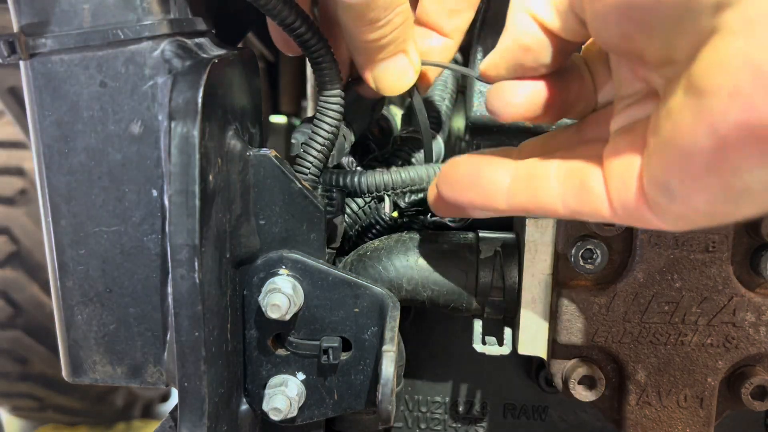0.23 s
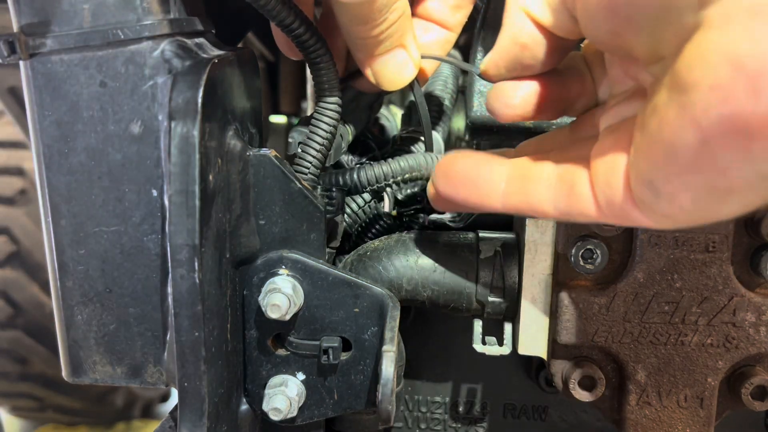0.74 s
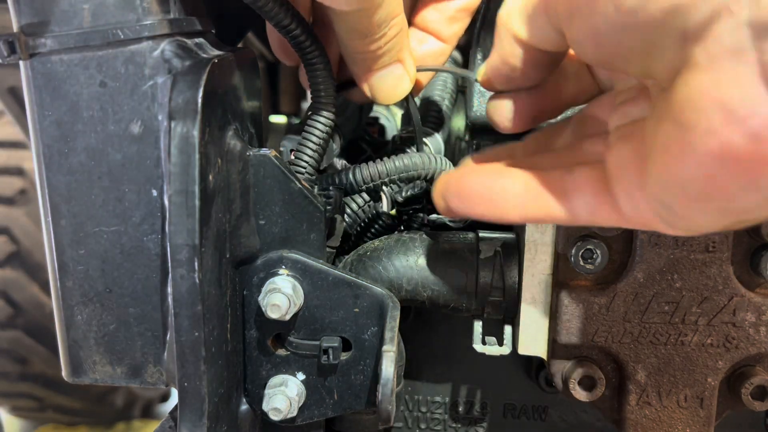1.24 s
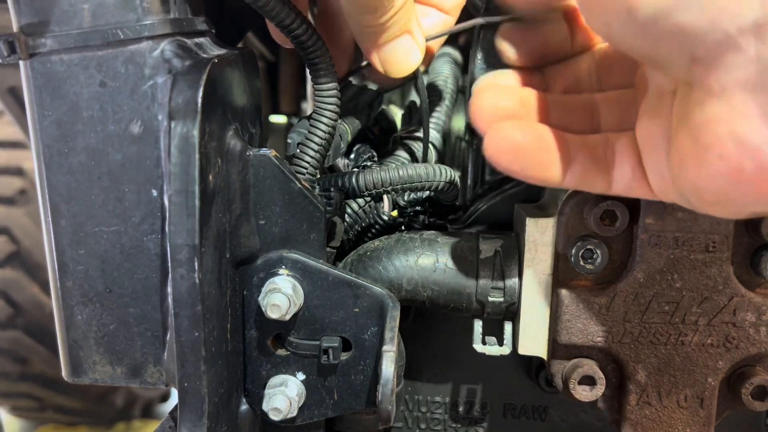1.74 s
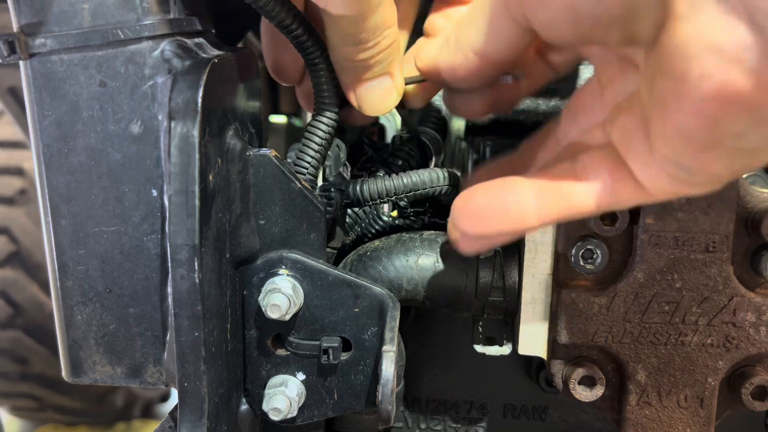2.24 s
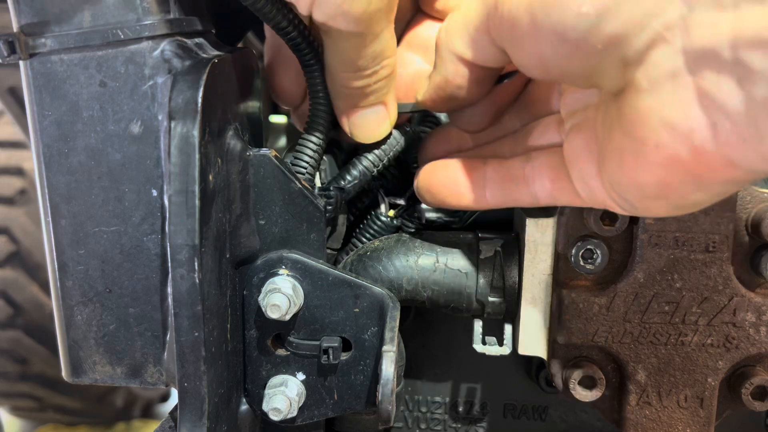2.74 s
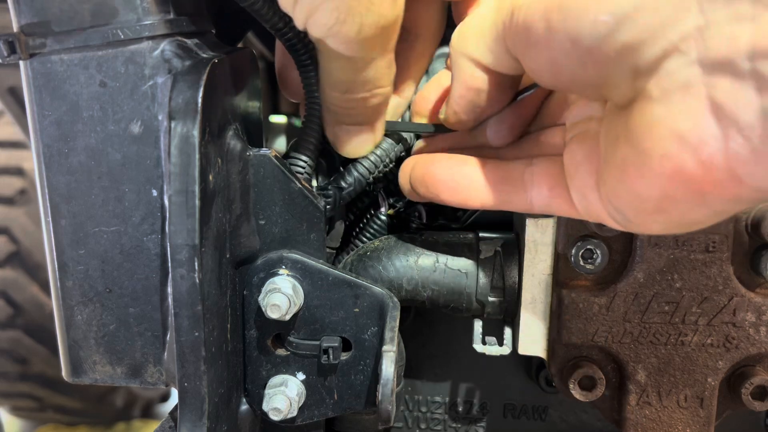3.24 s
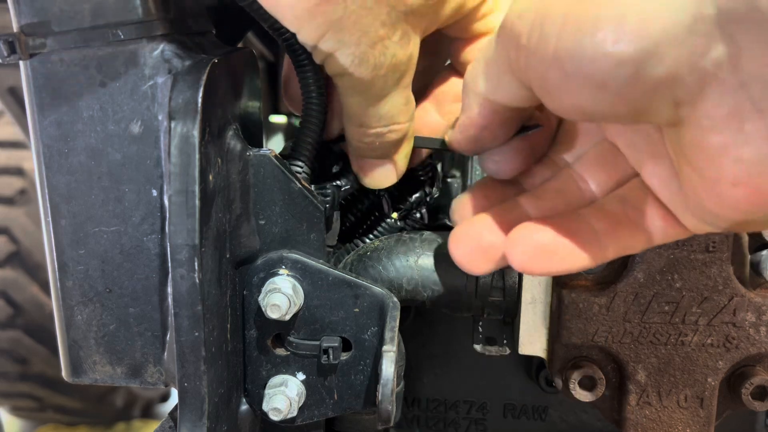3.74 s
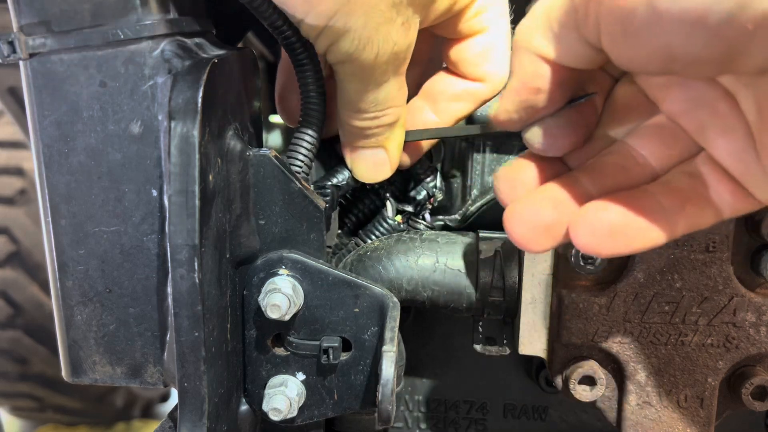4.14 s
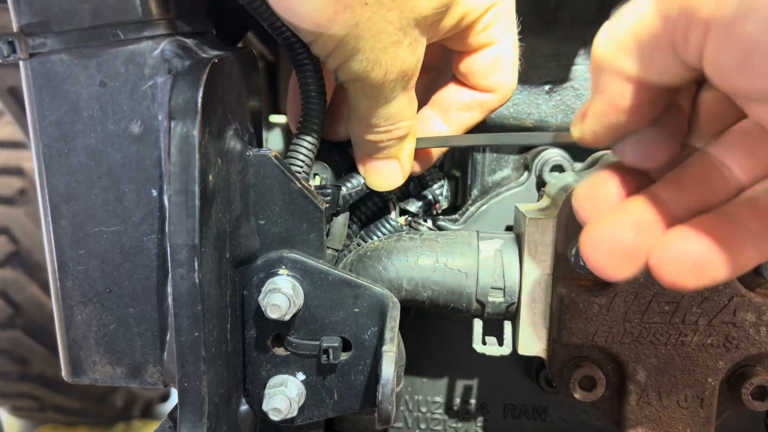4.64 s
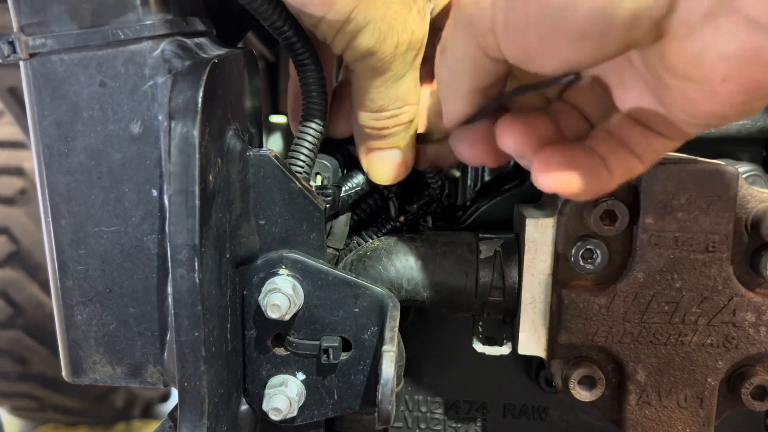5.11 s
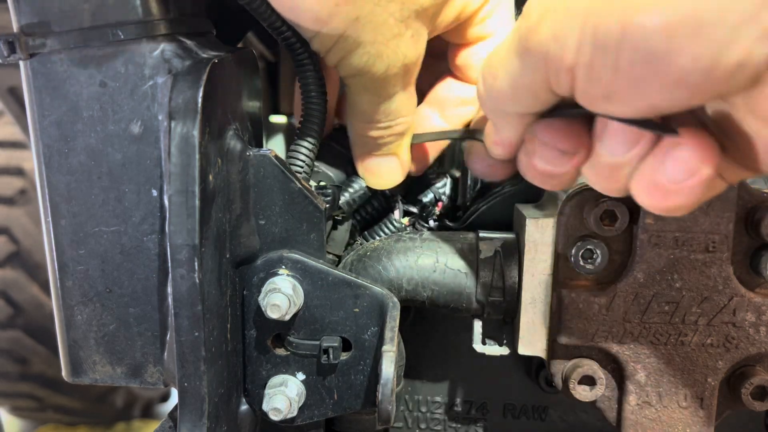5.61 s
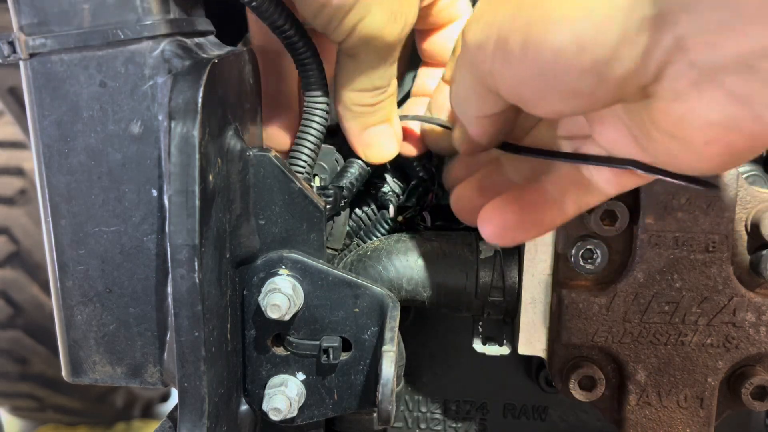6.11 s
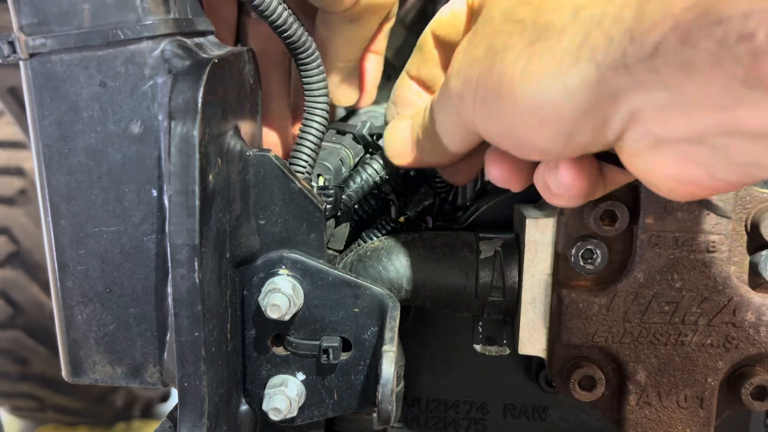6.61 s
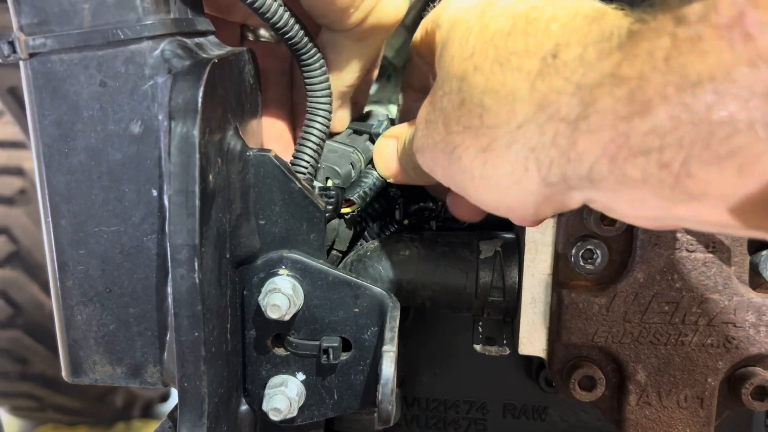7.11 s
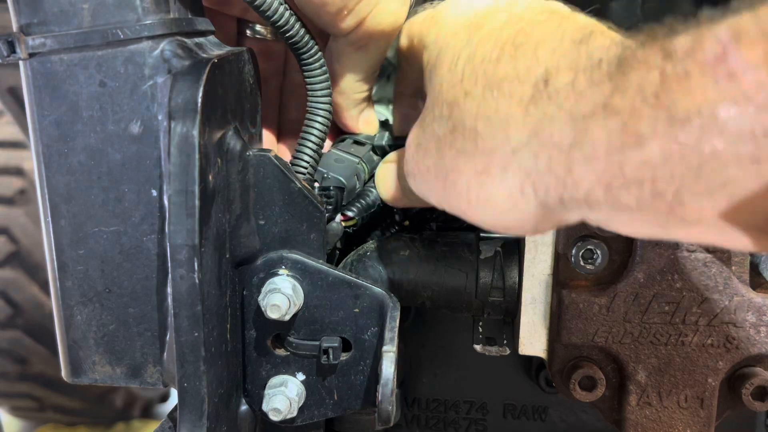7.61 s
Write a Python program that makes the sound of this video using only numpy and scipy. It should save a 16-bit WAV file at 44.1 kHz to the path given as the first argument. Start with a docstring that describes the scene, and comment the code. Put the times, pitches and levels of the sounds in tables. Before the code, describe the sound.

Close stereo sound of hands fitting a nylon zip tie round a wire harness in an engine bay. From 0 to 2.5 seconds there are small plastic taps and faint rustling on ribbed tubing, sparser after 1.5, with a firmer tap near 2.5. At about 2.7 the tie ratchets for a quarter second, sharp high clicks quickening. Scuffs and a soft rumble follow around 3. A longer, denser zip runs from 3.7 to 4.0, another from 4.15 to 4.45, both over low handling rumble. A clear knock comes near 4.9, then the last short zip from 5.25 to 5.5, ending with a hollow knock. A bright tap at 5.7, rubbing around 6.2 and a busy cluster of clicks and scrapes from 6.8 to 7.5 thin out by the end. Quiet air noise, low wavering machine hum and faint echo remain throughout.

```python
"""Engine bay in a workshop, close stereo microphone: a nylon zip tie is pulled tight round a harness.
In four pulls each tooth snaps the pawl, which rings very high, and flicks the strap into a falling chirp.
Between the pulls fingers tap and rub the plastic loom: dying modes, and runs of tiny noisy catches.
Behind lie steady air noise, wavering machine hum, low rumbles as the hand drags the harness, faint echo."""
import sys
import numpy as np
from scipy import signal
from scipy.fft import rfft, irfft
from scipy.io import wavfile

SR = 44100
rng = np.random.default_rng(int(sys.argv[2]) if len(sys.argv) > 2 else 0)


def store_pcm(level_fs):
    """Save levels as 16-bit WAV."""
    pcm = np.round(np.clip(level_fs, -1, 1) * 32767).astype(np.int16)
    wavfile.write(sys.argv[1], SR, np.atleast_2d(pcm).T)


N = 346626


def gain_of(db):
    """Decibels to amplitude."""
    return 10 ** (np.asarray(db) / 20)


def unit(x):
    """Scales a sound to energy 1."""
    return x / np.sqrt(np.sum(x ** 2) + 1e-20)


def read(points, hz):
    """Reads a table on a log-frequency axis."""
    f, value = np.transpose(points)
    return np.interp(np.log(hz + 1), np.log(f + 1), value)


def add(mix, s, sound):
    """Mixes a sound in at time s."""
    part = mix[max(round(s * SR), 0):][:len(sound)]
    part += sound[:len(part)]


def colour(x, points):
    """Filters by a spectrum in dB."""
    size = x.shape[-1]
    return irfft(rfft(x) * gain_of(read(points, np.fft.rfftfreq(size, 1 / SR))), size)


def click(points, size=1024):
    """A causal (minimum-phase) click of energy 1 with the given spectrum."""
    hz = abs(np.fft.fftfreq(size, 1 / SR))
    log_gain = np.log(gain_of(read(points, hz)))
    spectrum = np.exp(np.conj(signal.hilbert(log_gain)))
    return unit(np.fft.ifft(spectrum).real[:size // 2])


def ring(hz, t60, db, rise, scatter=1, size=2048):
    """Dying modes, energy 1, that build up over the rise time; with little scatter they start in step."""
    t = np.arange(size) / SR
    hz, t60, db = (np.reshape(c, (-1, 1)) for c in (hz, t60, db))
    decay = np.exp(-np.log(1000) * t / t60)
    cycles = hz * t + scatter * rng.random(hz.shape)
    modes = gain_of(db) * decay * np.sin(2 * np.pi * cycles)
    return unit(modes.sum(0) * (1 - np.exp(-t / rise)))


def scuffed(tick, decay, rough, rise):
    """A contact is never clean: a short burst of chatter swells and dies after the first touch."""
    t = np.arange(len(tick)) / SR
    envelope = np.exp(-t / decay) * (1 - np.exp(-t / rise))
    drive = rough * unit(rng.standard_normal(len(t)) * envelope)
    drive[0] += 1
    return unit(np.convolve(tick, drive))


def ramp(tick, swell, size=400):
    """Just before a slip the surfaces scrape, louder and louder."""
    t = np.arange(size) / SR
    scrape = np.convolve(tick, rng.standard_normal(size))[:size]
    return unit(scrape * np.exp((t - t[-1]) / swell))


def pair(x, same):
    """Turns two unrelated signals into left and right with the given likeness."""
    same = np.clip(same, -1, 1)
    shared = np.sqrt((1 + same) / 2) * x[0]
    return shared + np.sqrt((1 - same) / 2) * np.array([x[1], -x[1]])


# Spectrum of the workshop air. Each row: frequency in Hz, relative density in dB per Hz.
AIR_SPECTRUM = [(20, -17), (35, -9), (52, 0), (85, 5.5), (150, 0.5), (230, -6.5), (420, -9.5), (700, -22.5),
                (1300, -24), (2500, -35.5), (5000, -46), (9000, -62.5), (13000, -42.5), (16000, -43)]
# Width of the air; its bass is nearly mono. Each row: frequency in Hz, side minus mid in dB.
AIR_WIDTH = [(20, -21), (150, -11), (400, -6), (900, 2.5), (3000, -1.5), (16000, -25.5)]
# Distant machines. Each row: mean frequency in Hz, level in dB.
MACHINE_HUM = [(59.4, -52.5), (119.5, -55.5), (205, -64.5)]
AIR_DB = -52.5  # level of the mid channel


def workshop(wander_hz=.9):
    """Steady noise of the air, and the hum of distant machines wavering in pitch."""
    mid, side = colour(rng.standard_normal((2, N)), AIR_SPECTRUM)
    side = colour(side, AIR_WIDTH)
    air = np.array([mid + side, mid - side]) / mid.std()
    t, knots = np.arange(N) / SR, np.linspace(0, N / SR, num=32)
    hum = 0
    for hz, db in MACHINE_HUM:
        pitch = hz + wander_hz * np.interp(t, knots, rng.standard_normal(len(knots)))
        tone = np.sin(2 * np.pi * np.cumsum(pitch) / SR)
        hum = hum + np.sqrt(2) * gain_of(db) * tone
    return gain_of(AIR_DB) * air + hum


# Decay of the workshop's echo. Each row: frequency in Hz, t60 in seconds.
ROOM_T60 = [(100, .6), (500, 0.3), (2200, 0.24), (4500, 0.24), (8000, 0.27), (13000, 0.26), (16000, .4)]
# Strength of that echo. Each row: frequency in Hz, level in dB.
ROOM_SEND = [(100, -59), (700, -16), (1400, -8), (2200, -15), (3200, -10), (4500, -10.5), (8000, -15.5),
             (13000, -14), (16000, -24)]


def echoes(x, bay_db=-9, bay_t60=0.014, bay_gap=0.0018):
    """Quick noisy scatter from the engine bay, then the long faint tail of the workshop."""
    t = np.arange(SR) / SR
    bay_decay = np.exp(-np.log(1000) * t / bay_t60) * (t > bay_gap)
    scatter = rng.standard_normal((2, SR)) * bay_decay
    bay = pair(scatter / np.linalg.norm(scatter[0]), same=.35)

    hz, times, z = signal.stft(rng.standard_normal((2, SR)), SR, nperseg=256)
    t60 = read(ROOM_T60, hz)[:, None]
    level = np.sqrt(2 * np.log(1000) / (t60 * SR))  # equal energy whatever the decay
    z = z * np.exp(-np.log(1000) * times / t60) * level
    z = z * gain_of(read(ROOM_SEND, hz))[:, None]
    tail = pair(signal.istft(z, SR, nperseg=256)[1][:, :SR], same=.6)
    return signal.fftconvolve(x[None], gain_of(bay_db) * bay + tail, axes=1)[:, :N]


# Shoves of the hand against the harness. Each row: start in seconds, end in seconds, level in dB.
SHOVES = [(2.888, 2.998, -44), (3.699, 4.034, -47), (4.15, 4.48, -45.5), (5.304, 5.484, -49),
          (6.852, 7.072, -48.5)]
# Spectrum of their rumble. Each row: frequency in Hz, relative level in dB.
SHOVE_SPECTRUM = [(25, -24), (55, -0.5), (90, 6), (160, -3.5), (350, -4), (600, -20.5), (1200, -45),
                  (4000, -71.5)]


def shoves():
    """The hand drags the harness: low-coloured noise makes a soft rumble."""
    out, rumble = np.zeros(N), colour(rng.standard_normal(N), SHOVE_SPECTRUM)
    for start, end, db in SHOVES:
        part = rumble[round(start * SR):round(end * SR)] / rumble.std()
        add(out, start, gain_of(db) * part * signal.windows.tukey(len(part), .4))
    return out


# How busily the fingers work on the loom. Each row: time in seconds, level in dB before trims.
HANDLING = [(0.05, -66.5), (0.3, -78.5), (0.85, -73.5), (1.15, -82), (1.75, -81.5), (2.2, -71.5),
            (2.48, -60.5), (2.62, -71.5), (3.1, -62.5), (3.5, -74), (4.5, -75), (5.2, -67), (5.7, -66),
            (6.25, -69), (6.5, -76), (7.1, -67), (7.5, -68.5), (7.85, -69)]


def handling_db(t):
    """How busy the fingers are at time t; drives the faint rustle and the stray ticks."""
    return np.interp(t, *np.transpose(HANDLING))


# Firm slides of skin or strap over the ribs. Each row: start in seconds, end in seconds,
# level in dB before the rub trim, catches per second, resonance in Hz, resonance in dB over the scrape.
SLIDES = [(0.794, 0.9, -58, 90, 1840, -5), (3.108, 3.146, -52, 750, 4340, -5),
          (4.852, 4.918, -57.5, 2100, 1160, 3), (5.805, 5.856, -60.5, 1070, 4750, 0.5),
          (5.96, 5.977, -61, 930, 2200, 6.5), (6.173, 6.256, -52.5, 530, 1560, -21),
          (6.312, 6.351, -60, 590, 3930, -12), (6.83, 7.029, -62.5, 930, 830, 3),
          (6.997, 7.075, -56.5, 280, 6800, -1), (7.36, 7.427, -59, 200, 2340, 0),
          (7.48, 7.509, -49.5, 240, 2200, -25), (7.809, 7.867, -63.5, 400, 3300, 1.5)]
# Spectrum of one catch in rubbing. Each row: frequency in Hz, relative level in dB.
RUB_SPECTRUM = [(100, -9.5), (400, -9), (850, 0.5), (1300, -2.5), (2200, 0.5), (3200, -2.5), (4500, -4),
                (7000, -5), (10000, -8), (13000, -6), (14500, -13.5), (16000, -23.5)]
RUSTLE_PER_S, RUSTLE_HZ, RUSTLE_RING_DB = 1100, 2190, -1.5  # catches, and the resonance they ring


def rubs(rub_db=-1, ring_t60=0.0057, hiss_db=-23, catch_s=0.000403):
    """Sliding is a run of tiny catches over soft hiss under uneven pressure, ringing the part touched."""
    tick, t = click(RUB_SPECTRUM), np.arange(N) / SR
    spread_db = 5  # how widely the catches differ in strength
    chance, hiss = rng.random(N), rng.standard_normal(N)
    size = np.minimum(rng.exponential(1, N), 4)
    knots = np.arange(0, N / SR, .016)
    pressure = gain_of(3.5 * np.interp(t, knots, rng.standard_normal(len(knots))))
    hold = np.exp(-1 / (catch_s * SR))

    def slide(span, rate, hz, ring_db, fade):
        """One stretch of sliding, its scrape at level 1; every catch is its own burst of chatter."""
        catches = (chance[span] < rate / SR) * gain_of(spread_db * size[span])
        power = catches ** 2 + gain_of(hiss_db) ** 2
        power = signal.lfilter([1 - hold], [1, -hold], power)
        drive = np.sqrt(power) * hiss[span] * pressure[span]
        drive = drive * signal.windows.tukey(len(catches), fade)
        resonance = ring(hz, ring_t60, 0, rise=.0003)
        sound = gain_of(ring_db) * unit(signal.fftconvolve(drive, resonance))
        add(sound, 0, unit(signal.fftconvolve(drive, tick)))
        return np.sqrt(len(drive)) * sound

    rustle = slide(slice(0, N), RUSTLE_PER_S, RUSTLE_HZ, RUSTLE_RING_DB, fade=0)[:N]
    out = gain_of(handling_db(t)) * rustle
    for start, end, db, rate, hz, ring_db in SLIDES:
        span = slice(round(start * SR), round(end * SR))
        add(out, start, gain_of(db) * slide(span, rate, hz, ring_db, fade=0.63))
    return gain_of(rub_db) * out


TICK_DB, TICK_SPREAD_DB, TICK_HZ = 29, 6, 2480  # level over the handling, its scatter, typical ring
TICK_CRISP_DB, TICK_HOLLOW_DB = -5, 2


def stray_ticks(count=30, octaves=0.504):
    """Faint taps at random moments, louder while the fingers are busy; rows as in TAPS."""
    times = (np.arange(count) + rng.random(count)) * N / SR / count
    rows = []
    for s, (size, place) in zip(times, rng.standard_normal((count, 2))):
        db = handling_db(s) + TICK_DB + TICK_SPREAD_DB * size
        hz = TICK_HZ * 2 ** (octaves * place)
        rows.append((s, db, hz, 0, TICK_CRISP_DB, TICK_HOLLOW_DB))
    return rows


# Clear taps of the strap's tail or a finger on the loom. Each row: time in seconds, main ring in dB,
# main ring in Hz, then relative to that ring, before trims: clatter, crisp edge and hollow knock in dB.
TAPS = [(0.0142, -33.5, 4170, -3, -14, -6), (0.1139, -26.5, 8800, -4, -0.5, -18),
        (0.1696, -32, 2330, -7, -15, -3), (0.2719, -35, 8500, 5.5, -2, -8), (0.399, -32.5, 2300, 8.5, 7, 0),
        (0.5316, -31.5, 3500, 2, -10, -19), (0.5797, -23, 3800, 3, -9, -15),
        (0.778, -28.5, 2110, 0, -7, -2.5), (0.8017, -26, 1640, 4.5, -0.5, -6),
        (0.8947, -28.5, 2280, -3, -12, -2.5), (1.0515, -26.5, 2220, -16, -10, -5),
        (1.1942, -48.5, 8010, -3, 16.5, 1), (1.241, -17.5, 2220, -1, -9, -1.5),
        (1.466, -16.5, 2270, -2.5, -7, -1.5), (2.0037, -28.5, 2180, -4, -27, -8),
        (2.198, -43.5, 2300, 3, 4, 2), (2.453, -41.5, 2180, -10, 13.5, 2),
        (2.533, -7.5, 2310, -5, -10.5, -20), (3.0529, -25.5, 4600, -2, -3, -14),
        (3.123, -20.5, 4000, 4, 0.5, -7.5), (3.4489, -32.5, 1710, -2, -0.5, -3.5),
        (3.9904, -17.5, 1830, -6, -17, -8.5), (4.322, -17, 1870, -6, -23, -8),
        (4.352, -15.5, 1950, -3, -25, -25), (4.5855, -22.5, 2040, -4.5, -6, -13),
        (4.881, -9, 2380, -2.5, -29, -18), (5.179, -30, 2290, -11, -28, -11.5),
        (5.459, -9, 522, -5, -20, -8.5), (5.6789, -19.5, 2290, -7.5, -18, -19),
        (5.7329, -8, 3240, -11, -5.5, -42), (5.813, -34, 1620, 4, 4.5, -3.5),
        (6.2028, -28.5, 1520, 4, 1.5, -19.5), (6.3654, -28.5, 4540, 5.5, -2, -9),
        (6.7439, -35, 8520, -2, -6, -11), (6.8631, -18.5, 2250, -3.5, -12.5, -6.5),
        (7.0672, -14.5, 3840, 1, -6, -31), (7.0823, -13.5, 3400, 8.5, -0.5, -16.5),
        (7.2426, -4, 6580, 6, -5.5, -43), (7.3098, -18, 5950, 3.5, -0.5, -31),
        (7.3493, -16.5, 3400, -11, -5.5, -21), (7.3619, -23.5, 1530, -13, -24, -13),
        (7.369, -13.5, 3350, -2.5, -14, -27), (7.4495, -29, 6100, -2, -7, -9),
        (7.4994, -29, 2150, 9.5, -1, -7), (7.5556, -30.5, 2900, 4.5, -20, -6),
        (7.723, -28, 2370, -2, -24, -7.5)]
# Modes of the ribbed loom and its clips. Each row: frequency in Hz, t60 in seconds, relative level in dB.
LOOM_MODES = [(1420, 0.069, -23), (1775, 0.0247, -10.5), (2237, 0.013, -1.5), (2930, 0.0041, -2),
              (3330, 0.031, -10), (4075, 0.019, -8), (4805, 0.0062, -3), (6000, 0.0021, -15),
              (7260, 0.002, 1.5)]
# Air in the loom's tube. Each row: frequency in Hz, t60 in seconds, relative level in dB.
HOLLOW_MODES = [(720, 0.011, -13), (884, 0.0078, 10.5), (983, 0.015, 1.5)]
# Crisp edge of a tap. Each row: frequency in Hz, relative level in dB.
EDGE_SPECTRUM = [(500, -6.5), (3000, -26.5), (7000, -3.5), (10000, -6.5), (13000, -1), (15000, -6.5),
                 (16500, -50.5)]
# Toneless rattle of the wires in the loom. Each row: frequency in Hz, relative level in dB.
RATTLE_SPECTRUM = [(300, -18), (900, -22.5), (2000, -1.5), (4000, 5), (6500, -1), (8500, 0.5), (10000, -37),
                   (13000, -14.5), (16000, -24.5)]
TAP_PAN_DB, TAP_PAN_SPREAD_DB = 0.6, 3.5  # left minus right, and its scatter from place to place


def taps(main_cycles=15, main_rise=0.00037, body_db=-7, focus_db=3.0, puff_db=-3.0, edge_db=1,
         scrape_db=-17, uneven_db=1.5, detune=0.052, rise=0.0014):
    """Each tap rings one loom resonance above its neighbours; the modes shift with the place hit."""
    out, modes, hollow = np.zeros((2, N)), np.array(LOOM_MODES), np.transpose(HOLLOW_MODES)
    edge, grain = click(EDGE_SPECTRUM), click(RUB_SPECTRUM)
    for s, db, hz, clatter_db, crisp_db, hollow_db in [*TAPS, *stray_ticks()]:
        pan_db = TAP_PAN_DB + TAP_PAN_SPREAD_DB * rng.standard_normal()
        drift, weight = rng.standard_normal((2, len(modes)))
        octaves_away = abs(np.log2(modes[:, 0] / hz))
        modes_db = modes[:, 2] + uneven_db * weight - focus_db * octaves_away
        clatter = ring(modes[:, 0] * (1 + detune * drift), modes[:, 1], modes_db, rise)
        tap = gain_of(clatter_db + body_db) * clatter
        tap += ring(hz, main_cycles / hz, 0, main_rise)
        tap += gain_of(hollow_db) * ring(*hollow, rise)
        crisp = scuffed(edge, decay=0.001, rough=3.8, rise=.0003)
        add(tap, 0, gain_of(crisp_db + edge_db) * crisp)
        scrape = gain_of(scrape_db) * np.linalg.norm(tap) * ramp(grain, swell=.0013)
        contact = np.concatenate([scrape, tap])
        for port, side_db in zip(out, (pan_db / 2, -pan_db / 2)):
            add(port, s - len(scrape) / SR, gain_of(db + side_db) * contact)
            # the rattle reaches each port by its own paths
            rattle = scuffed(click(RATTLE_SPECTRUM), decay=0.00084, rough=6.7, rise=0.00026)
            add(port, s, gain_of(db + side_db + clatter_db + puff_db) * rattle)
    return out


# Bending wave of the strap. Each row: frequency in Hz, relative level in dB.
STRAP_SPECTRUM = [(30, -5), (60, 11.5), (100, 5.5), (170, 2), (300, 1), (500, -3.5), (800, -6.5),
                  (1300, -9.5), (2500, -87)]


def flick(lag, power=0.86, size=4096):
    """The strap is dispersive: low notes arrive later, so a flick becomes a falling chirp."""
    hz = np.fft.rfftfreq(size, 1 / SR)
    delay = lag * (1000 / np.maximum(hz, 40)) ** power  # seconds
    phase = 2 * np.pi * np.cumsum(delay) * SR / size
    spectrum = gain_of(read(STRAP_SPECTRUM, hz)) * np.exp(-1j * (phase - phase[size // 20]))
    return unit(irfft(spectrum)[:size // 2])


# The pulls. Each row: lag of the strap's wave at 1 kHz in seconds, mean pawl ring at the first tooth
# in dB, at the last tooth in dB, slack of the strap in dB added to its flick.
PULLS = [(0.00088, 1.1, 1.2, -1.5), (0.0009, -2, -7.5, -1), (.0009, -3.3, -6, 0), (0.00076, -6, -5.5, -3)]
# Strap drawn through the head, one curve a pull; every whole tooth clicks.
# Each row: time in seconds, teeth drawn.
TRAVEL = [
    [(2.6795, 0), (2.7024, 1), (2.7376, 2), (2.7648, 3), (2.7993, 4), (2.825, 6), (2.8626, 10),
     (2.8995, 12), (2.9127, 13), (2.9355, 16), (2.9456, 17)],
    [(3.6696, 0), (3.6822, 1), (3.7225, 3), (3.738, 4), (3.8167, 11), (3.8466, 13), (3.8835, 17),
     (3.9212, 24), (3.9475, 27), (3.9895, 29), (4.0221, 30)],
    [(4.1487, 0), (4.1728, 3), (4.1972, 5), (4.2439, 7), (4.3099, 9), (4.3581, 12), (4.4178, 15),
     (4.4448, 17)],
    [(5.2493, 0), (5.2652, 1), (5.2858, 5), (5.297, 6), (5.3395, 9), (5.375, 11), (5.4195, 14), (5.446, 15),
     (5.455, 16), (5.4682, 22), (5.4974, 23)],
]
# Tension in the strap, one curve a pull. Each row: time in seconds, level in dB.
TENSION = [
    [(2.68, -9), (2.735, -9.5), (2.77, -15), (2.90, -18.5), (2.945, -16.5)],
    [(3.67, -16.5), (3.72, -11), (3.74, -20), (3.84, -22.5), (3.92, -17.5), (4.02, -17.5)],
    [(4.15, -18.5), (4.22, -16), (4.38, -17), (4.445, -18.5)],
    [(5.25, -15), (5.275, -16), (5.29, -17.5), (5.42, -20), (5.458, -12.5), (5.47, -26), (5.497, -12)],
]
EASY_TEETH_PER_S, FLICK_DB_PER_OCTAVE = 52, 1  # the faster the strap runs, the harder it is flicked
FLICK_GROWTH_DB = 1  # and the more so as its free tail grows, from start to end of a pull
TOOTH_SPREAD_DB = 1.33  # no two teeth are quite alike


def teeth():
    """The teeth as they pass the pawl: time in s, pull, then pawl ring, head snap, strap flick in dB."""
    for pull, (travel, tension, row) in enumerate(zip(TRAVEL, TENSION, PULLS)):
        _, first_db, last_db, slack_db = row
        when, drawn = np.transpose(travel)
        times = np.interp(np.arange(drawn[-1] + 1), drawn, when)
        progress, speed = np.linspace(0, 1, len(times)), 1 / np.gradient(times)
        uneven = TOOTH_SPREAD_DB * rng.standard_normal((len(times), 3)).T
        tension_db = np.interp(times, *np.transpose(tension))
        ring_db = first_db + (last_db - first_db) * progress
        speed_db = FLICK_DB_PER_OCTAVE * np.log2(speed / EASY_TEETH_PER_S)
        flick_db = tension_db + slack_db + speed_db + FLICK_GROWTH_DB * (progress - .5)
        levels = ring_db + uneven[0], tension_db + uneven[1], flick_db + uneven[2]
        yield from zip(times, [pull] * len(times), *levels)


# Modes of pawl and head, weighted anew by the grip in each pull.
# Each row: mean frequency in Hz, then mean relative level in dB in pulls 1, 2, 3 and 4.
PAWL_MODES = [(8210, -12.5, -9, -7, -9), (8720, -5, -9, -5.5, -9.5), (10610, -6, -4.5, -4, -6.5),
              (11460, 4.5, -5, -3, -2), (13180, -1, -2.5, 1, 0), (13290, 8, -1.5, -12, -9),
              (13500, -6, -20, 0.5, -50), (14340, -3, -11, -8, -1), (14000, 4.5, 1.5, 3.5, -3)]
# Dry snap of the head. Each row: frequency in Hz, relative level in dB.
SNAP_SPECTRUM = [(300, -17.5), (900, 12.5), (1300, -1.5), (1900, 12), (2800, 8), (4000, 5), (5500, 5),
                 (7500, 1), (10000, -37.5), (16000, -39)]
PAWL_T60 = .0045  # seconds


def zip_tie(strap_db=2.5, hum_hz=1650, hum_t60=0.051, hum_db=-15, scrape_db=-14):
    """Every tooth scrapes, rings the pawl, snaps the head and flicks the strap; the loom hums faintly."""
    out, snap, modes = np.zeros(N), click(SNAP_SPECTRUM), np.array(PAWL_MODES)
    chirps = [flick(lag) for lag, *_ in PULLS]
    for s, pull, ring_db, head_db, flick_db in teeth():
        drift, weight = rng.standard_normal((2, len(modes)))
        hz = modes[:, 0] * (1 + .012 * drift)
        db = modes[:, 1 + pull] + 1.5 * weight
        pawl = ring(hz, PAWL_T60, db, rise=.0003, scatter=.3)
        bounce_s, bounce_db = rng.uniform(.0011, .0024), -13
        add(pawl, bounce_s, gain_of(bounce_db) * pawl)  # the pawl lands twice
        head = scuffed(snap, decay=.0007, rough=1.1, rise=.0002)
        scrape = ramp(snap, swell=.0006)
        loom_hum = ring(hum_hz, hum_t60, 0, rise=0.00018)
        add(out, s - len(scrape) / SR, gain_of(head_db + scrape_db) * scrape)
        add(out, s, gain_of(ring_db) * unit(pawl))
        add(out, s, gain_of(head_db) * head)
        add(out, s, gain_of(head_db + hum_db) * loom_hum)
        add(out, s, gain_of(flick_db + strap_db) * chirps[pull])
    return out


def scene(count=3, shift_hz=2.3, tie_send_db=-1, hands_send_db=3.0):
    """Tie and hands in bay and workshop; the moving hands keep changing the echo paths."""
    tie, hands = zip_tie(), taps() + rubs()
    send = gain_of(tie_send_db) * tie + gain_of(hands_send_db) * hands.mean(0)
    turn = np.pi * shift_hz * np.arange(N) / SR
    # the squares of the shares sum to 1
    shares = [np.sqrt(2 / count) * np.cos(turn + np.pi * k / count) for k in range(count)]
    echo = sum(echoes(share * send) for share in shares)
    return tie + hands + echo + shoves() + workshop()


# How far the left microphone port lags the right. Each row: frequency in Hz, phase in radians.
PORT_LAG = [(20, 0), (200, -.1), (500, -.25), (1000, -.1), (2200, -.42), (4000, -.85), (6000, .3),
            (7000, .3), (9300, 2.7), (10600, 3.5), (12000, 5.6), (13500, 6.8), (15300, 9.1), (17000, 9.6)]
CUT_HZ = 16500


def record(dry, balance_db=0.46):
    """The two microphone ports drift apart in phase in the treble; then the band limit."""
    lag = read(PORT_LAG, np.fft.rfftfreq(N, 1 / SR))
    left = irfft(rfft(dry[0]) * np.exp(-1j * lag), N)
    ports = np.array([gain_of(balance_db) * left, gain_of(-balance_db) * dry[1]])
    lowpass = signal.firwin(401, CUT_HZ, window=("kaiser", 9), fs=SR)
    return signal.oaconvolve(ports, lowpass[None], "same")


dry = scene()
out = record(dry)
store_pcm(out)
```